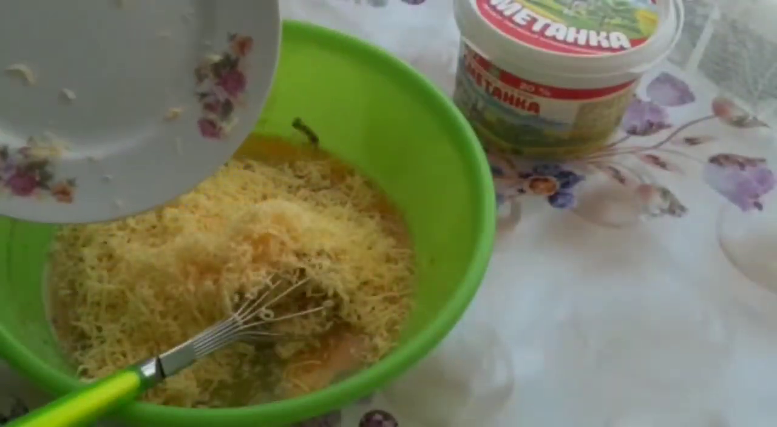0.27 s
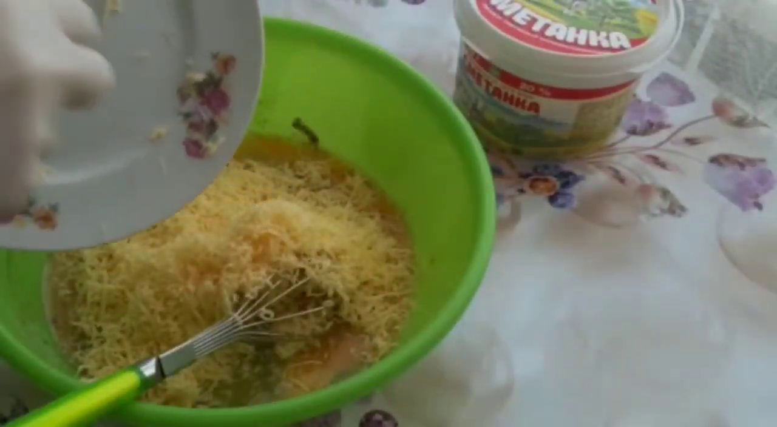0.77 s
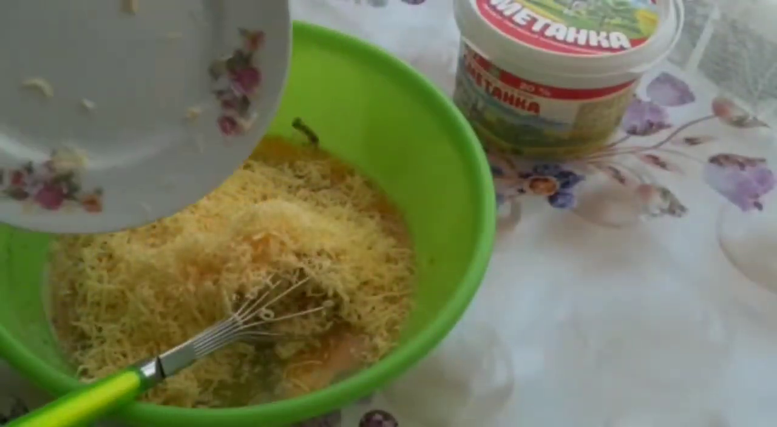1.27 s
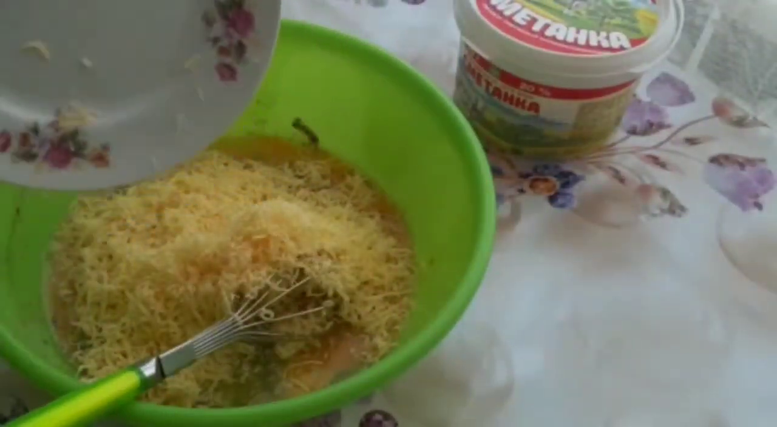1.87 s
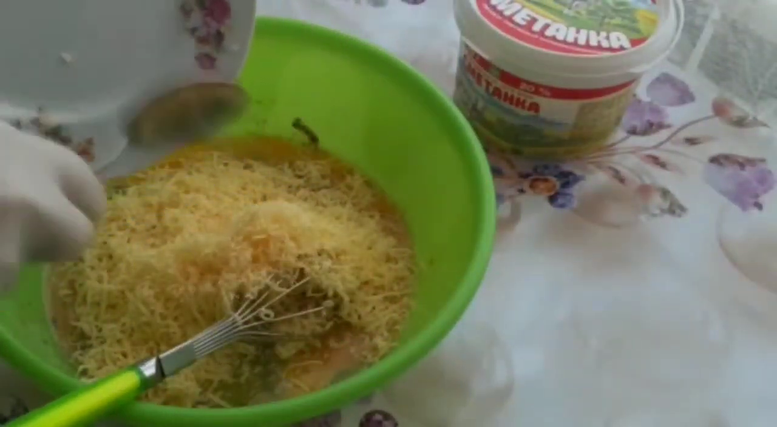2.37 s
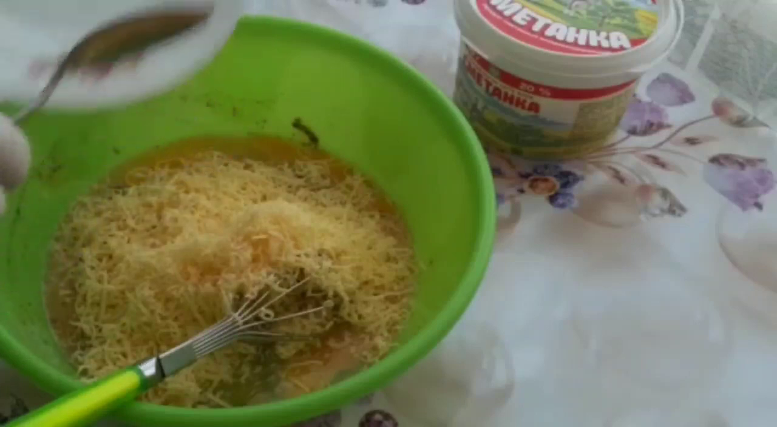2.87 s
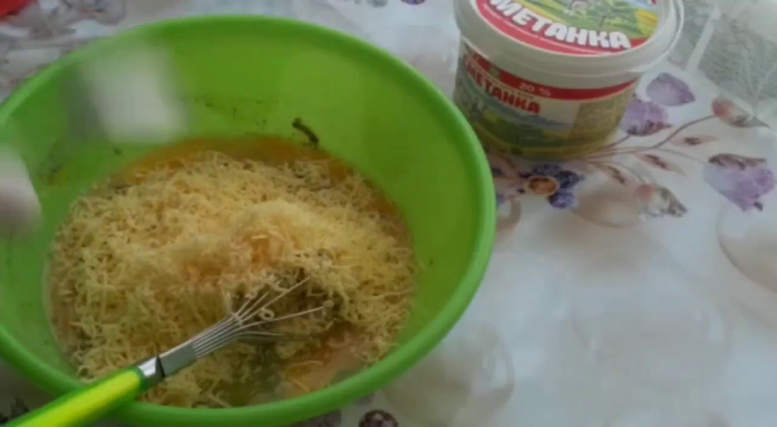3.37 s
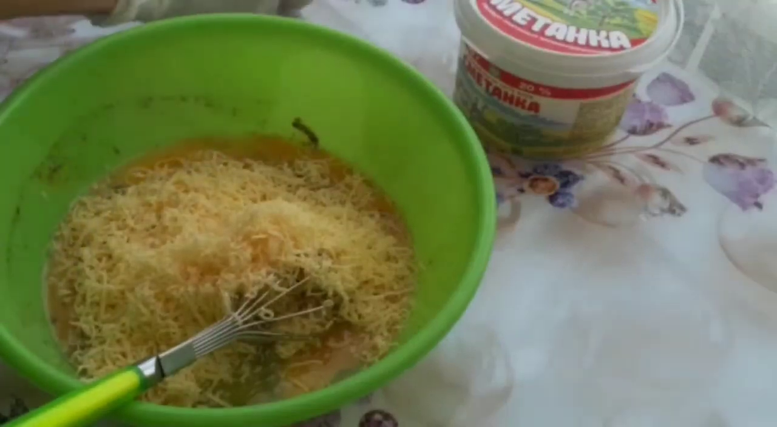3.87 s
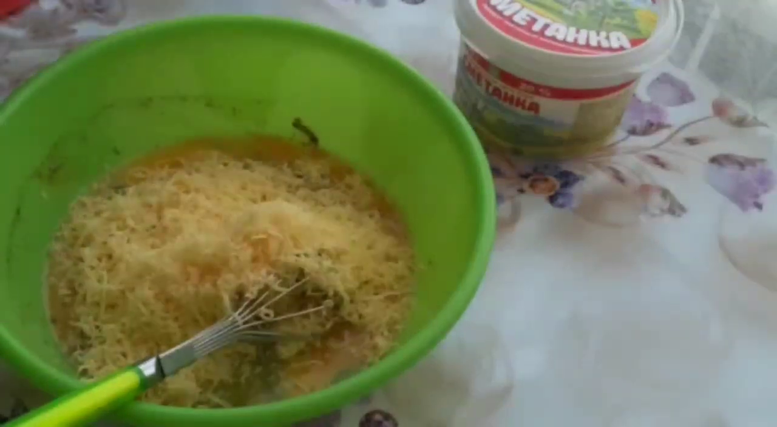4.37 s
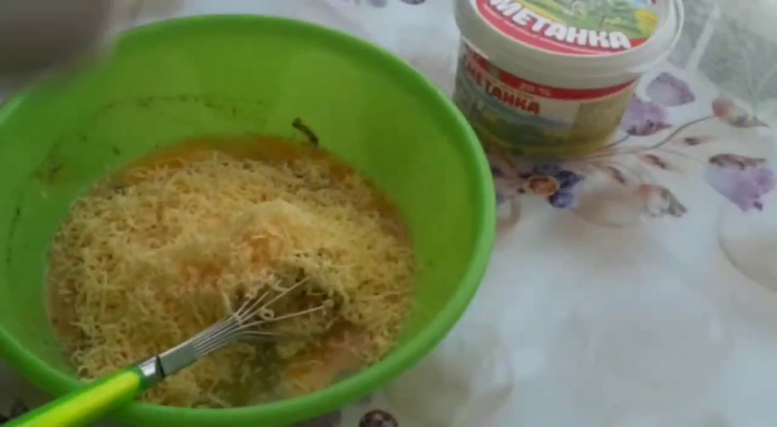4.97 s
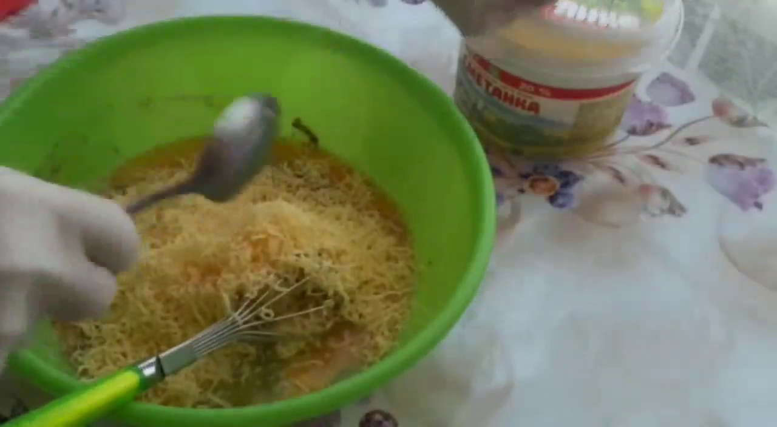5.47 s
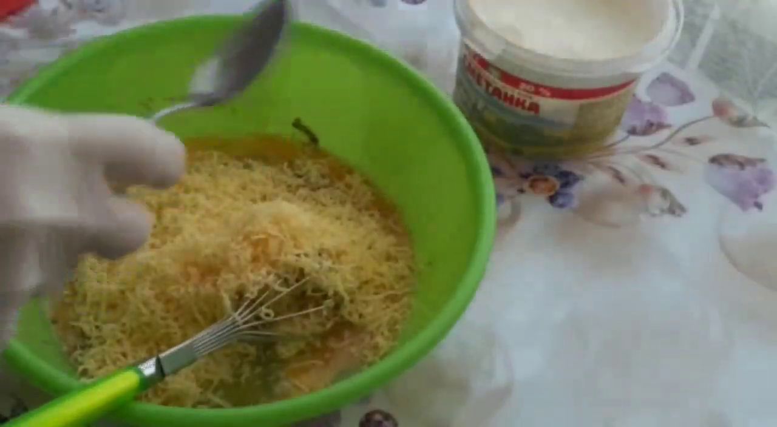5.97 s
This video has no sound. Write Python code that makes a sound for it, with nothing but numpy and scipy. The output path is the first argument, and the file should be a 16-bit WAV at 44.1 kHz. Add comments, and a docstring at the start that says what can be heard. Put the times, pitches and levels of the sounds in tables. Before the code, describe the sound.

Close up in a small home kitchen, a metal spoon gives a quick gritty scrape across a hand-held china saucer, then a run of sharp, short clinks. A light spoon tick follows, then thumps on the table and the saucer clatters down, rocking briefly. Soft glove rustles and faint ticks continue until a dull knock ends it, over low humming room noise.

```python
"""A china saucer, held in the hand, is scraped and tapped by a steel spoon: clicks and grains excite damped modes.
Set down on the table it rocks, driving the same modes in another balance; thuds ring the table's modes.
Light ticks of spoon, glove and lid are noise bursts, and the rustle of gloved hands is banded random grains.
A small kitchen adds reflections; a throbbing low drone, a hum, room noise and a thin whine lie underneath.
A look-ahead limiter holds the peaks."""
import sys
import numpy as np
from scipy import signal
from scipy.fft import rfft, irfft, next_fast_len
from scipy.io import wavfile
from scipy.ndimage import uniform_filter1d, minimum_filter1d

SR = 44100
rng = np.random.default_rng(int(sys.argv[2]) if len(sys.argv) > 2 else 0)


def volts(x):
    """Linear amplitude factor 10**(x/20) for a level x in dB, scalar or array-like."""
    e = np.asarray(x, float) / 20
    return 10 ** e


def file_out(sig):
    """Save sig as 16-bit WAV at sys.argv[1]."""
    # one column per channel
    cols = np.atleast_2d(sig).T
    # limit, then scale
    lim = np.clip(cols, -1, 1)
    pcm = np.round(lim * 32767).astype(np.int16)
    wavfile.write(sys.argv[1], SR, pcm)


N = 273596


def saucer():
    """Modal superposition: blows and drags drive the same modes, weighted by where and how the glaze is met."""
    # saucer modes: f/Hz, relative level/dB when struck in the hand, when rubbed, when set down, t60/s
    modes = np.array([(743, -1, 5.5, -13.5, 0.031), (1118, 4.5, 8.5, -8.5, 0.02), (1414, 1, 1, -6, 0.026),
                      (1998, -1.5, 2.5, 1, 0.013), (2030, -20, -8, -15.5, 0.16),
                      (2190, -27, -21, -4.5, 0.02), (2672, -9, -9, -7.5, 0.045), (2885, 3.5, 1.5, 0, 0.069),
                      (2953, -21.5, -13.5, -0.5, 0.073), (3170, -6, -0.5, -11, 0.032),
                      (4237, -0.5, 7, -12, 0.035), (4342, -16, -9, -20, 0.12),
                      (4600, -32, -21.5, -28, 0.19), (5700, -5.5, -6, 7, 0.05), (6357, 2.5, -1, 8, 0.032),
                      (6800, -5, 1.5, -19, 0.017), (7320, -13, -9.5, -24.5, 0.083),
                      (8252, -2.5, -26, 3, 0.06), (8576, -30, -3.5, -16.5, 0.049),
                      (9380, -54, -10.5, -4, 0.031), (10400, -32, -5.5, -25, 0.034),
                      (10300, -8, -14.5, -27, .05), (11170, -4, -6, -13.5, 0.0782), (11880, 2, -14, 1, .06),
                      (13800, -41, -6, -12, 0.045), (13530, -16.5, -3.5, -19, 0.047),
                      (14080, 3, -12.5, -13.5, 0.037), (13550, 6.5, 1, -36, 0.022),
                      (14200, -16, -1, -23.5, 0.034), (14370, 23, -15, -23, 0.034),
                      (14900, 20.5, -1, -16.5, 0.033), (15530, -5, -9.5, -2.5, 0.04)])
    # edges of the five families of modes: f/Hz
    family_edges_hz = [500, 2400, 3700, 5000, 10000, 16500]
    # blows: t/s, level/dB, brightness/dB, spot/dB, weight/dB
    blows = np.array([(0.2744, -59.5, 8, -3.5, 11), (0.6551, -59, 17, -1, -5), (1.3268, -26, 20, 5, -5),
                      (1.3567, -48, 8, 2, 11), (1.4435, -41, 7, 6, 3), (1.474, -54, 9, 11, 3),
                      (1.527, -25, 15, 1.5, 2.5), (1.6054, -42, 6, 1.5, -3), (1.735, -27, 14.5, -2.5, -1.5),
                      (1.9073, -16.5, 10, 1.5, -4.5), (2.0399, -24.5, 20.5, -1.5, 12),
                      (2.0434, -27.5, 11.5, -2, 4.5), (2.0916, -41.5, 18, -2.5, 5),
                      (2.3059, -25.5, 10, -4, -1), (2.399, -45.5, 12, -6, 7), (2.6302, -15.5, 13, -1, -2.5),
                      (4.4569, -8.5, -3, -1.5, 5), (4.6087, -22, 3.5, -4, -5.5), (4.6164, -13, 5, 2.5, -11)])
    # level/dB of each family, lowest first: struck in the hand, rubbed, set on the table, rocking there
    struck_db = [-3, -1, 1, -1.5, 0]
    rubbed_db = [-15.5, -4, -5.5, -1, 1.5]
    set_db = [-9, 0, -11.5, -14, -20]
    rocked_db = [-14, -2, -22, -23.5, -27]
    # share of a contact's brightness that each family gets
    edge_share = [0, 0.0, 0.0, 0.27, 1]
    # share of the spot: nearer the rim the third family gains and the second loses
    spot_share = [0.31, -1, 1, -0.023, -0.093]
    # share of the weight: a heavy blow bends the whole saucer
    weight_share = [1, 0, 0, 0.092, 0]
    set_down_s, crack_db, clatter_db = 4.0, 9.5, -2.5
    # modes waver unevenly in level, sharing three random wanders, in the hand and on the table
    waver_db, waver_per_s = 3.5, 39.8

    hit, age = since(blows[:, 0])
    # first contact, then micro-bounces that die away
    bounces = 0.27 * grains(2800, 3.83) * volts(-60 * age / 0.0084)
    contact = 1.0 * (age == 0) + bounces
    clatter = grains(9300, 3.4) * volts(-60 * age / 0.087)   # the many weak modes between the strong ones
    spot = volts(rng.normal(0, 2, (len(blows), len(modes))))   # every blow lands on another spot
    family = np.searchsorted(family_edges_hz, modes[:, 0]) - 1
    resting = np.arange(N) > set_down_s * SR
    blow_resting = blows[:, 0] > set_down_s
    rough = np.where(resting, volts(-2), 1)   # the contact noise is weaker after set-down
    grit = grains(2500, 5)
    waver = [volts(waver_db * drift(waver_per_s)) for wander in range(3)]
    pressure, spot_db, progress = drags()
    out = np.zeros(N)
    for f in range(len(struck_db)):
        own = np.flatnonzero(family == f)
        levels_db = modes[own, 1:4]
        share = volts(levels_db) / np.sqrt(np.sum(volts(2 * levels_db), axis=0))   # unit power per family
        stored = np.mean(modes[own, 4]) * SR / (4 * np.log(1000))   # power gain for a steady rub
        drag_db = np.where(resting, rocked_db[f], rubbed_db[f]) + spot_share[f] * spot_db
        drag = grit * pressure * volts(drag_db)
        blow_db = blows[:, 1] + np.where(blow_resting, set_db[f], struck_db[f])
        blow_db = blow_db + edge_share[f] * blows[:, 2] + spot_share[f] * blows[:, 3]
        blow = volts(blow_db + weight_share[f] * blows[:, 4])[hit]
        dragged = drag * ~resting / np.sqrt(stored)
        rocked = drag * resting / np.sqrt(stored)
        for k, (struck, rubbed, set_down) in zip(own, share):
            blow_share = spot[:, k] * np.where(blow_resting, set_down, struck)
            force = blow * contact * blow_share[hit]
            force += rubbed * dragged + set_down * rocked
            out += (-1) ** k * waver[k % len(waver)] * ring(force, modes[k, 0], modes[k, 4])
        # the contact itself: a crack and a hiss that fill the gaps between the modes
        fill = blow * (volts(crack_db) * contact + volts(clatter_db) * clatter) + volts(-8.5) * drag
        out += band(rough * fill, *family_edges_hz[f:f + 2])
    return out + flexing_spoon(grit * pressure * ~resting, spot_db, progress)


def drags():
    """Stick-slip friction: uneven pressure gain, with spot and progress of all drags, silent between them."""
    # the spoon edge in the long scrape: t/s, level/dB, spot/dB
    scrape = np.array([(.54, -78, 6), (.554, -63.5, 6.5), (.64, -73.5, -3), (.658, -59.5, 3),
                       (.702, -65.5, 1), (.886, -52.5, 0), (.934, -58, -1.5), (.998, -42, -.5),
                       (1.014, -31.5, -.5), (1.062, -23.5, 1.5), (1.088, -35.5, 0.5), (1.13, -50.5, -1.5)])
    # short drags, and the foot rocking after set-down: t/s, length/s, level/dB at start, at end, spot/dB
    strokes = [(0.284, 0.11, -83, -69, 3.5), (1.349, .085, -48.5, -55, -1), (1.439, 0.1, -50, -39.5, 0),
               (1.541, 0.11, -26, -51, -1.5), (1.933, 0.098, -54, -40.5, -6.5),
               (2.061, 0.065, -39.5, -52.5, -1.5), (2.325, .07, -53.5, -50.5, 4.5),
               (2.397, 0.085, -43, -58.5, -1.5), (4.464, 0.19, -18, -40.5, 1.5),
               (4.62, 0.079, -16.5, -28.5, 3)]
    slip_db, slips_per_s, spot_wander_db = 1, 28, 1
    t = np.arange(N) / SR
    scraping = (t >= scrape[0, 0]) & (t < scrape[-1, 0])
    gain = volts(curve(scrape[:, :2])) * scraping
    spot_db = spot_wander_db * drift(8.0) + curve(scrape[:, ::2]) * scraping
    progress = np.zeros(N)
    for s, length, start_db, end_db, at_db in strokes:
        at = (t >= s) & (t < s + length)
        progress[at] = (t[at] - s) / length
        gain[at] = volts(start_db + (end_db - start_db) * progress[at])
        spot_db[at] += at_db
    slip = volts(slip_db * np.clip(drift(slips_per_s), -2, 2))
    return gain * slip, spot_db, progress


def flexing_spoon(steel, spot_db, progress):
    """Stress stiffening: the pressed spoon bowl tightens through each short drag, so its resonances rise."""
    bowl_hz, wander_hz, rise_hz = 4319, 91, 350
    pitch_hz = bowl_hz + rise_hz * progress + wander_hz * drift(15.0)
    upper = sliding_resonance(volts(-2.5 + spot_db) * steel, pitch_hz, width_hz=89)
    # a lower bowl mode slides along with it
    return upper + sliding_resonance(volts(-6 - spot_db) * steel, .64 * pitch_hz, width_hz=40)


def sliding_resonance(force, hz, width_hz):
    """Heterodyne resonator of moving pitch: shift down, smooth, shift back."""
    turn = np.exp(2j * np.pi * np.cumsum(hz) / SR)
    r = np.exp(-np.pi * width_hz / SR)
    smooth = signal.lfilter([np.sqrt(2 * (1 - r * r))], [1, -r], force / turn)
    return np.real(smooth * turn)


def ticks():
    """Impulsive excitation: a click and a short dying rattle in three bands; one tap also rings the spoon."""
    # light ticks of spoon, glove and lid: t/s, level/dB, loss towards the low band/dB, t60/s
    rows = np.array([(0.431, -25.5, 7.5, 0.028), (.529, -34.5, 23, .025), (2.955, -25, 9.5, 0.18),
                     (3.507, -44, 8, 0.049), (3.646, -48, 13, 0.073), (3.925, -46, 18, 0.036),
                     (3.988, -34, 7.5, 0.044), (4.245, -43, 3, 0.056), (4.862, -49, 20, 0.039),
                     (4.958, -45.5, 2, 0.034), (5.05, -59.5, -8, 0.057), (5.527, -44, 4, 0.037),
                     (5.554, -44, 1, 0.075), (5.601, -38, 14.5, 0.037), (5.668, -46, 4.7, 0.042),
                     (5.841, -44, 6, 0.031), (6.145, -23, -2, 0.037)])
    # spoon modes: f/Hz, relative level/dB, t60/s
    spoon_modes = [(2053, -14, 0.047), (3870, -3, 0.032), (5820, -2.5, 0.036), (12620, 3, 0.065),
                   (14800, -7, 0.037)]
    tap_s, tap_db = 2.957, -53   # the spoon meets the bowl's rim and rings
    hit, age = since(rows[:, 0])
    level_db, loss_db = rows[:, 1], rows[:, 2]
    rattle = volts(-60 * age / np.maximum(rows[hit, 3], .002)) * grains(5500, 2.7)
    burst = volts(5) * (age == 0) + rattle
    out = band(volts(level_db)[hit] * burst, 12000, 18600)
    out += band(volts(level_db - 3 - .7 * loss_db)[hit] * burst, 5500, 10000)
    out += band(volts(level_db - loss_db)[hit] * burst, 1800, 5000)
    tap = volts(tap_db) * (since([tap_s])[1] < .003) * grains(5980, 4.1)
    return out + sum(volts(db) * ring(tap, hz, t60) for hz, db, t60 in spoon_modes)


def table():
    """Modal damping: a dull or sharp contact knocks the table's modes; many weak ones merge to a dying rush."""
    # table top modes: f/Hz, relative level/dB, t60/s
    table_modes = [(132.8, -12.5, 0.1174), (230.6, -12, 0.085), (316.8, -10, 0.1), (389, -4.5, 0.091),
                   (503, -1.5, 0.1), (557, 0.5, .04), (706, 3.5, 0.072), (750, 0.5, .04), (961, 6.5, .03),
                   (1280, 12, 0.0297), (1480, -2, .03), (1570, -7, 0.067)]
    # thuds: t/s, level/dB, contact sharpness f/Hz, weight/dB
    thuds = np.array([(3.993, -24.5, 624, 5.5), (4.25, -22, 1280, 3), (4.456, -44, 1300, 3),
                      (4.615, -25.5, 898, 1), (5.184, -49, 500, -12), (5.48, -41.5, 500, -10),
                      (6.143, -18.5, 644, -5)])
    hit, age = since(thuds[:, 0])
    level_db, sharp_hz, weight_db = thuds[:, 1], thuds[:, 2], thuds[:, 3]
    bounces = 0.21 * grains(1000, 2.77) * volts(-60 * age / 0.063)
    contact = 1.0 * (age == 0) + bounces
    rush = rng.standard_normal(N) * volts(-60 * age / 0.18)
    spot_db = rng.normal(0, 2, (len(thuds), len(table_modes)))   # each thud weights the modes anew
    knock = volts(level_db)[hit] * (volts(15.5) * contact + volts(1.5) * rush)
    out = band(knock * volts(weight_db)[hit], 130, 290) + band(knock, 270, 830)
    out += band(knock * volts(-9) * (sharp_hz[hit] / 1000) ** 0.91, 900, 1400)
    for k, (hz, db, t60) in enumerate(table_modes):
        mode_db = level_db - 17 + db + spot_db[:, k] + weight_db * (hz < 330)
        level = volts(mode_db) / np.hypot(1, (hz / sharp_hz) ** 2)   # a soft contact drives high modes weakly
        out += (-1) ** k * ring(contact * level[hit], hz, t60)
    return out


def rustle():
    """Granular friction noise: dense bright glove crinkle and a duller rub; each move fades and is patchy."""
    # hands and lid moving: t/s, length/s, crinkle level/dB, low rub level/dB
    moves = [(2.854, .08, -86, -82), (3.283, .19, -78, -64.5), (3.482, 0.232, -71, -65),
             (3.717, 0.282, -75, -69.5), (4.339, .11, -66, -59.5), (4.764, 0.21, -66.5, -81),
             (4.953, 0.53, -70, -73), (5.454, 0.19, -63.5, -65.5), (5.637, 0.43, -70, -71.5),
             (6.073, 0.075, -65, -77)]
    fade_s, patchy_db = 0.025, 1.5
    t, crinkle, rub = np.arange(N) / SR, 0, 0
    for s, length, crinkle_db, rub_db in moves:
        move = np.clip(np.minimum(t - s, s + length - t) / fade_s + .5, 0, 1)
        crinkle = crinkle + volts(crinkle_db) * move
        rub = rub + volts(rub_db) * move
    bright = rms_one(band(grains(4430, 2.4), 5500, 16500))
    dull = rms_one(band(grains(800, 3.0), 300, 860))
    crinkle = crinkle * volts(patchy_db * drift(16.0)) * bright
    return crinkle + rub * volts(patchy_db * drift(18.2)) * dull


def kitchen(x):
    """Diffuse reverberation dying band by band: three random echo patterns crossfade in a steady cycle."""
    # reverberation of the kitchen: f/Hz, t60/s
    kitchen_t60 = [(200, 0.38), (1000, 0.26), (4000, 0.2), (15000, 0.13)]
    t, size, out = np.arange(SR // 2) / SR, next_fast_len(N + SR), 0
    for pattern in range(3):   # several patterns, so that no mode is always favoured
        white = rng.standard_normal(len(t))
        tail = 0
        for hz in 125 * 2. ** np.arange(8):   # octave bands
            octave = band(white, hz / np.sqrt(2), min(hz * np.sqrt(2), .45 * SR))
            tail = tail + octave * volts(-60 * t / at_hz(kitchen_t60, hz))
        tail *= np.clip((t - .002) / 0.0019, 0, 1)   # no echo in the first 2 ms
        tail /= np.sqrt(np.sum(tail ** 2))
        # the three squared weights always sum to one
        turn = np.sqrt(2 / 3) * np.cos(np.pi * (np.arange(N) / SR / .5 + pattern / 3))
        out = out + rfft(x * turn, size) * rfft(tail, size)
    return irfft(out, size)[:N]


def drone():
    """Amplitude and frequency modulation: a low tone throbs unevenly and now and then swells and rises."""
    # slow course of the drone: t/s, level/dB
    drone_db = [(0, -66), (2.5, -63.5), (4.4, -63), (6.3, -70.5)]
    # swells: t/s at the top, half length/s, level rise/dB, pitch rise f/Hz
    swells = [(1.17, 0.28, 8, 12.4), (2.68, 0.093, 3, 5.6), (4.04, 0.11, 3, 6.5), (4.32, .13, 7, .5),
              (4.664, 0.11, 4, 9)]
    t = np.arange(N) / SR
    hz, db = 62, curve(drone_db)
    for s, half, swell_db, rise_hz in swells:
        swell = np.clip(1 - np.abs(t - s) / half, 0, 1)
        hz = hz + rise_hz * swell
        db = db + swell_db * swell
    throb = rms_one(band(rng.standard_normal(N), 5.4, 22.0))
    tone = np.sin(2 * np.pi * np.cumsum(hz + 2.5 * throb) / SR)
    return np.sqrt(2) * volts(db + 2.5 * throb) * tone


def background():
    """Spectral shaping of noise: coloured room noise, plus hum and whine as narrow resonances that waver."""
    # colour of the room noise: f/Hz, relative density level/dB
    room_noise = [(30, -25), (80, -4), (100, -18.5), (139, -3.5), (185, -5), (355, -9.5), (613, -9.5),
                  (832, -8.5), (1080, -1.5), (1600, -8), (2820, -20.5), (4870, -25.5), (9360, -26.5),
                  (14800, -20), (16500, -20)]
    # course of the room noise: t/s, rms level/dB
    room_noise_db = [(0, -57), (4.4, -56.5), (5.1, -60), (6.3, -59.5)]
    # hum and whine: f/Hz, width/Hz, rms level/dB, full from t/s
    hum = [(137, 14, -70, 0), (8750, 4, -78, 3)]
    hz = np.arange(N // 2 + 1) * SR / N
    out = volts(curve(room_noise_db)) * shaped_noise(volts(at_hz(room_noise, hz)))
    for centre_hz, width_hz, db, start in hum:
        peak = 1 / (1 + (2 * (hz - centre_hz) / width_hz) ** 2)
        fade_in = np.clip(np.arange(N) / SR - start + 1, 0, 1) ** 2
        out += volts(db) * fade_in * shaped_noise(peak)
    return out


def shaped_noise(gain):
    """Linear filtering in the frequency domain: white noise of the given spectrum, unit rms."""
    return rms_one(irfft(rfft(rng.standard_normal(N)) * gain, N))


def ring(force, hz, t60):
    """Damped harmonic oscillator: a unit click sets a decaying sine of initial height 1 ringing."""
    r = volts(-60 / (max(t60, .005) * SR))
    w = 2 * np.pi * hz / SR
    return signal.lfilter([0, np.sin(w)], [1, -2 * r * np.cos(w), r * r], force + 1e-18)


def grains(per_s, spread_db):
    """Poisson-like impulse train: random clicks of uneven size and sign; rms 1."""
    sizes = volts(spread_db * np.minimum(rng.exponential(1, N), 4)) * rng.choice([-1, 1], N)
    return rms_one(sizes * (rng.random(N) < per_s / SR))


def drift(per_s):
    """Low-passed noise: a slow random wander of rms 1."""
    r = np.exp(-2 * np.pi * per_s / SR)
    return rms_one(signal.lfilter([1], [1, -2 * r, r * r], rng.standard_normal(N + SR))[SR:])


def band(x, low_hz, high_hz):
    """Band-pass filtering."""
    return signal.sosfilt(signal.butter(2, [low_hz, high_hz], "band", fs=SR, output="sos"), x + 1e-18)


def rms_one(x):
    """Power normalisation to unit rms."""
    return x / np.sqrt(np.mean(x ** 2) + 1e-20)


def at_hz(points, hz):
    """Interpolation of (f/Hz, value) on a log-frequency axis."""
    points_hz, values = np.transpose(points)
    return np.interp(np.log(hz + 1), np.log(points_hz), values)


def curve(rows):
    """Linear interpolation of (t/s, value) at every sample."""
    return np.interp(np.arange(N) / SR, *np.transpose(rows))


def since(times):
    """Event timing: for every sample the latest event's index and its age in s (99 before the first)."""
    start = np.round(np.asarray(times) * SR).astype(int)
    latest = np.searchsorted(start, np.arange(N), "right") - 1
    age = np.where(latest < 0, 99, (np.arange(N) - start[latest]) / SR)
    return np.maximum(latest, 0), age


def scene():
    """Superposition: all near sources share the room; noise and drone are added to them."""
    near = saucer() + ticks() + table() + rustle()
    return (near + volts(-2.5) * kitchen(near) + background() + drone())[None]


def limiter(x, ceiling_db, ahead_s, release_db_per_s):
    """Look-ahead gain control: gain drops shortly before a peak above the ceiling and climbs back after it."""
    need_db = np.minimum(0, ceiling_db - 20 * np.log10(np.abs(x) + 1e-9))
    ahead = int(ahead_s * SR)
    held = minimum_filter1d(need_db, ahead, origin=-(ahead // 2))
    climb = release_db_per_s * np.arange(N) / SR
    gain_db = np.minimum.accumulate(held - climb) + climb
    return x * volts(uniform_filter1d(np.minimum(gain_db, 0), size=200))


def roll_off(x):
    """The treble ends steeply here."""
    return signal.sosfilt(signal.butter(12, 16830, fs=SR, output="sos"), x)


def record(dry):
    """Peak limiting, then a steep low-pass that removes the extreme treble."""
    limited = limiter(dry[0], ceiling_db=-5.5, ahead_s=.046, release_db_per_s=114.5)
    top_cut = signal.cheby2(14, 40, 16050, fs=SR, output="sos")
    mix = signal.sosfilt(top_cut, limited)[None]
    return roll_off(mix)


dry = scene()
out = record(dry)
file_out(out)
```